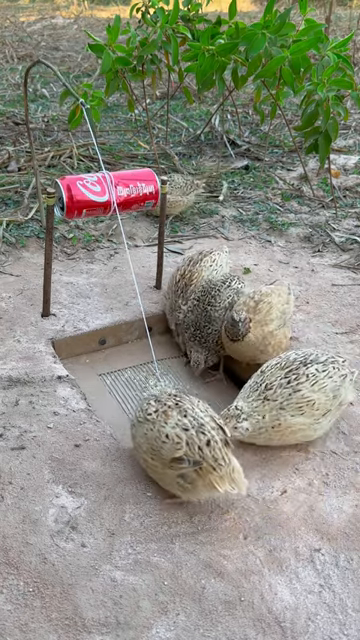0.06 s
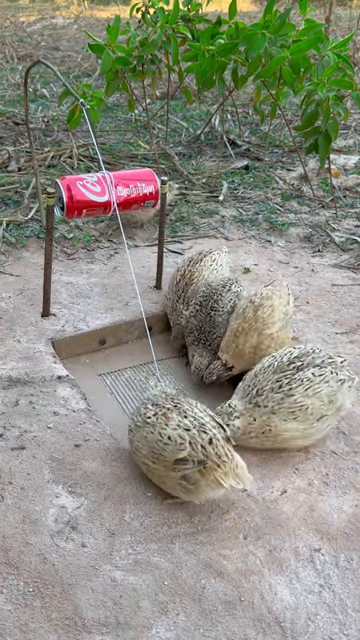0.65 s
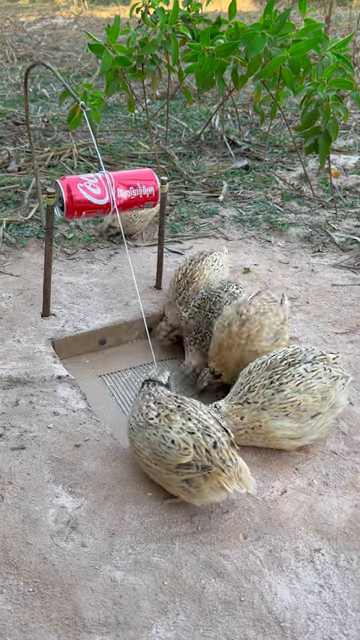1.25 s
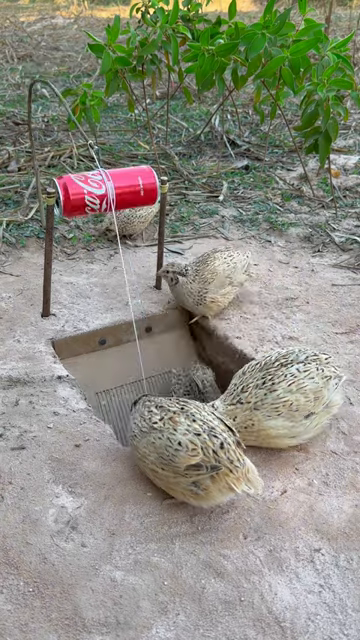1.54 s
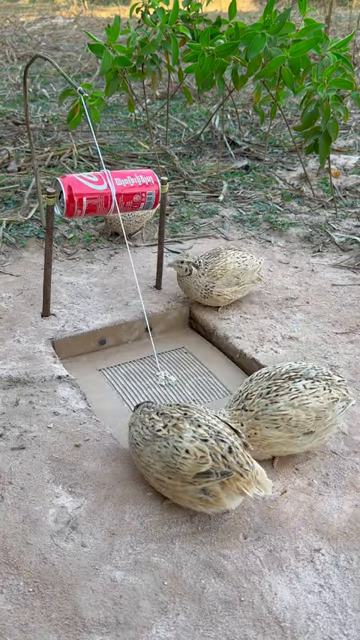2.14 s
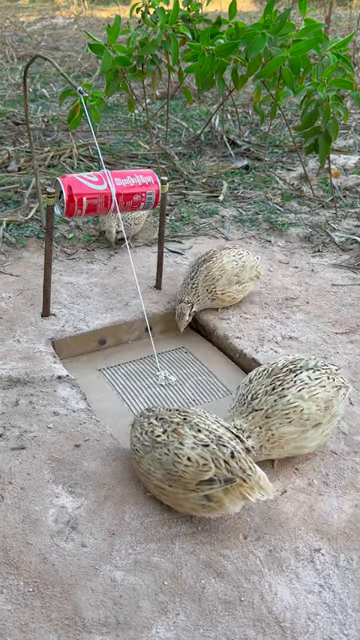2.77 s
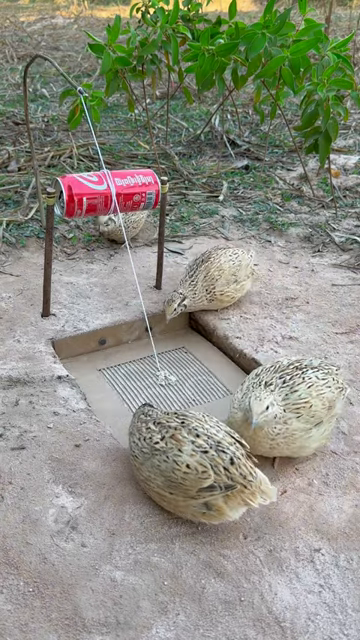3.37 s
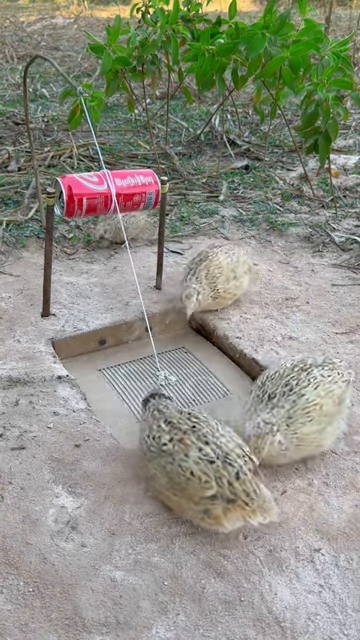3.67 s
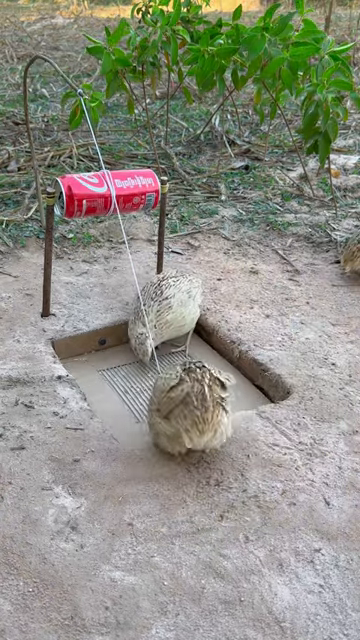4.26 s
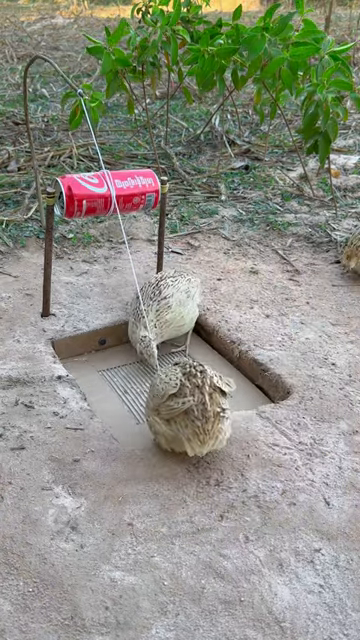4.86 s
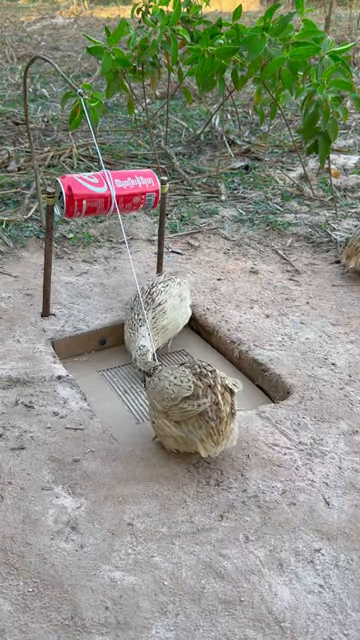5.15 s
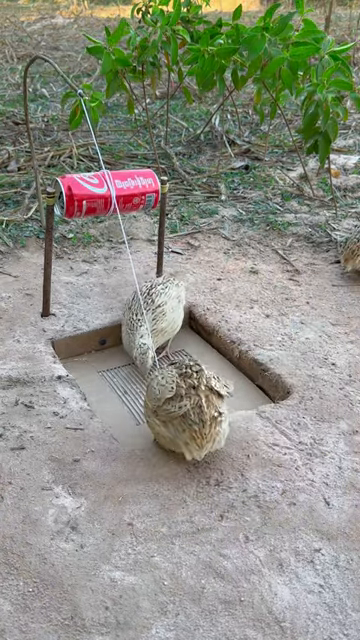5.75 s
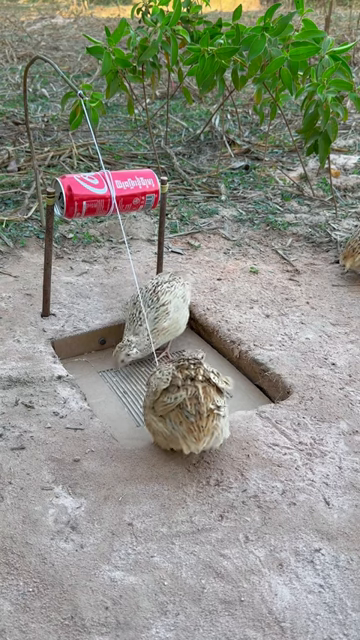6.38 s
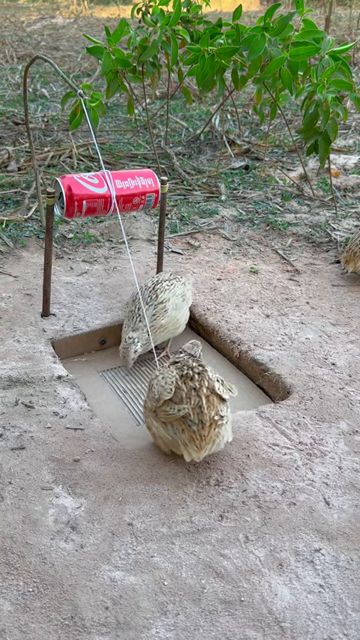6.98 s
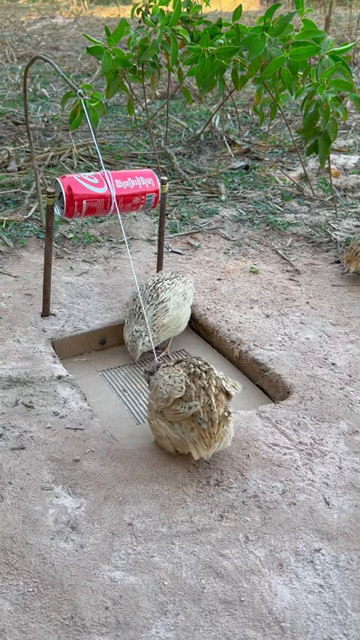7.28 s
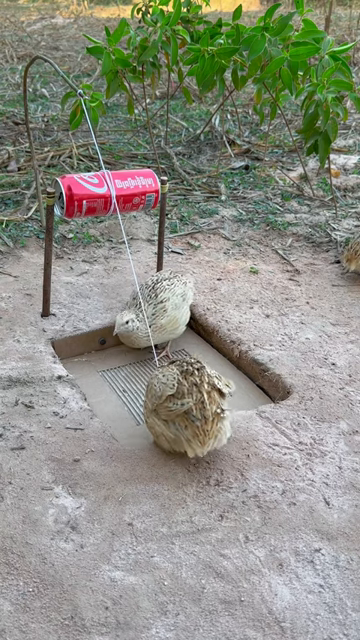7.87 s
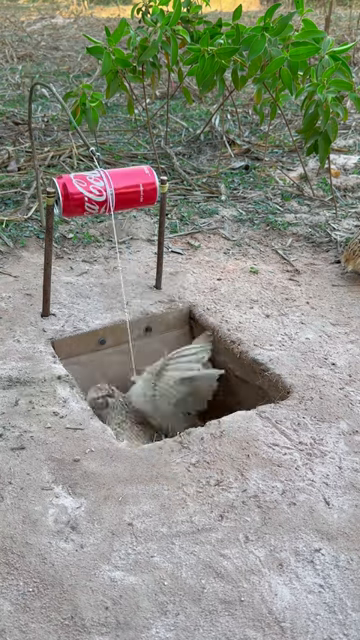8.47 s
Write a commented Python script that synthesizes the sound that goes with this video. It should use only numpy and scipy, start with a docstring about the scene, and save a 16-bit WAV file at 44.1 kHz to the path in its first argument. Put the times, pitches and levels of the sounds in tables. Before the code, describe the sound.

Quail peck grain off a hollow mesh lid in quick, uneven taps, twice scrabbling and flapping as it tips.

```python
"""Quail peck grain off the mesh of a hinged trap lid that covers a pit in a quiet yard.
Each impact excites the modes of lid and mesh; the lid booms over the hollow and loose grain jumps.
Twice the lid tips and birds slide in, with the friction noise of claws and flapping feathers.
Far insects and a bird sound as narrow bands of noise over a low rumble of air."""
import sys
import numpy as np
from scipy import signal
from scipy.fft import rfft, irfft, next_fast_len
from scipy.io import wavfile
from scipy.ndimage import uniform_filter1d

SR = 44100
rng = np.random.default_rng(int(sys.argv[2]) if len(sys.argv) > 2 else 0)


def transcribe(u):
    """Save the signal u as a 16-bit wav file named by the first command-line argument.

    u: samples, shape (n,) or (channels, n), limited to [-1, 1]; the rate is SR.
    q: integer samples, one column per channel.
    """
    v = np.clip(np.atleast_2d(u).T, -1, 1)
    q = np.round(v * 32767).astype(np.int16)
    wavfile.write(sys.argv[1], SR, q)


N = 380135

# Pecks and steps on the level lid. Each row: time in seconds, knock in dB, knock centre in Hz,
# beak click in dB, boom in dB, length of the push in seconds.
LEVEL_BLOWS = [(0.052, -36, 820, -55.5, -23, .022), (0.255, -42.5, 1090, -56.5, -28, .018),
               (0.354, -35, 835, -56, -20, .016), (0.391, -49, 1150, -55, -22, .01),
               (0.581, -31, 700, -51, -18.5, .015), (0.766, -36.5, 870, -76, -19.5, .017),
               (0.807, -42.5, 756, -46, -17.5, .012), (0.926, -39, 950, -53.5, -18.5, 0.01538),
               (0.953, -35.5, 635, -52.5, -27.5, .018), (1.125, -39.5, 880, -67, -24, .017),
               (1.261, -40, 750, -69, -25, .01), (1.268, -28, 785, -69, -17, .009),
               (1.414, -33.5, 630, -66, -18, .013), (3.594, -45.5, 865, -58.5, -21, .016),
               (3.633, -38, 1090, -50, -20.5, 0.012), (3.657, -48, 900, -50, -22.5, .016),
               (3.921, -33, 740, -46, -18.5, 0.0083), (4.124, -41.5, 740, -49, -23.5, .01),
               (4.351, -41, 716, -45.5, -23.5, 0.0077), (4.537, -43, 684, -57, -22, .011),
               (4.727, -32.5, 636, -62, -20, .027), (5.176, -31, 1110, -47, -17.5, 0.027),
               (5.395, -38.5, 840, -56, -25, 0.032), (5.629, -39.5, 1080, -66, -21, 0.024),
               (5.799, -31.5, 830, -44.5, -21, .026), (6.012, -33, 1220, -48.5, -18.5, .033),
               (6.209, -38.5, 830, -51, -22.5, 0.0097), (6.395, -38, 900, -50.5, -20, 0.0098),
               (6.724, -39.5, 900, -45, -22, 0.0074), (6.872, -37, 1070, -47, -18, 0.0052),
               (7.027, -28.5, 665, -45, -22.5, .004), (7.072, -60, 800, -64, -29.5, .018),
               (7.321, -37, 760, -52, -25.5, .042), (8.003, -35, 875, -46, -27.5, .026),
               (8.049, -36, 1250, -59, -33, 0.021), (8.067, -25.5, 1060, -52, -32, 0.011)]
# Claws and bodies on the tipped lid. Each row: the same six columns, then spilling grain in dB.
TIPPED_BLOWS = [(1.442, -29, 900, -40.5, -40, 0.007, -67), (1.454, -31, 610, -53, -23, 0.01, -47),
                (1.517, -28.5, 1140, -30.5, -26, 0.01, -46.5), (1.531, -28, 780, -41, -23, .02, -55.5),
                (1.603, -28, 695, -60, -37, 0.0091, -61), (1.623, -31, 755, -76, -29.5, 0.029, -59),
                (1.703, -41, 1070, -69, -35.5, .02, -54.5), (1.791, -37.5, 980, -50, -33.5, 0.03, -57),
                (1.858, -38, 1190, -45.5, -20.5, 0.013, -71), (1.873, -41, 653, -66, -17, 0.0084, -75),
                (8.165, -37, 895, -49.5, -25.5, 0.014, -68), (8.205, -35.5, 960, -43.5, -33.5, 0.0234, -57),
                (8.282, -38.5, 1070, -36, -50, .012, -41.5), (8.341, -28.5, 910, -44, -22.5, 0.026, -42),
                (8.499, -35.5, 1240, -47, -19.5, 0.019, -48), (8.518, -46, 1013, -38.5, -36, 0.0084, -46.5),
                (8.553, -38.5, 1310, -41.5, -17, 0.0072, -50.5)]
def blows(spill_s=1.2, full_grain_db=-31, spilled_grain_db=-36.5, onset_db=-21):
    """Impact excitation: each blow knocks the lid, pings the mesh and tosses grain."""
    rows = [(s, knock, centre, click, boom + (full_grain_db if s < spill_s else spilled_grain_db))
            for s, knock, centre, click, boom, push in LEVEL_BLOWS]
    rows += [(s, knock, centre, click, grain) for s, knock, centre, click, *_, grain in TIPPED_BLOWS]
    t, out = np.arange(round(.16 * SR)) / SR, np.zeros(N)
    for s, knock_db, centre_hz, click_db, grain_db in rows:
        add(out, s, gain_of(knock_db) * lid_knock(t, centre_hz))
        add(out, s, gain_of(click_db) * mesh_click(t))
        add(out, s, gain_of(grain_db) * jumping_grain(t))
        add(out, s - t[-1], gain_of(knock_db + onset_db) * soft_onset(t))
    return out

# Modes of the lid. Each row: frequency in Hz, level in dB, time to decay by 60 dB in seconds.
LID_MODES = [(251, 11.5, 0.017), (341, -3.5, 0.017), (454, -7.5, 0.083), (620, 0, 0.051), (740, 0, 0.02),
             (900, -0.5, 0.022), (1020, -8, 0.034), (1190, -7, 0.025), (1500, 1, 0.012), (1761, -7, 0.036),
             (1953, -6, 0.0099), (2317, -13, 0.066)]
def lid_knock(t, centre_hz, from_hz=583, to_hz=209.6, glide_s=.0036, swell_s=.006):
    """Forced vibration: contact drives the modes, and the lid gives way in a falling chirp."""
    force = contact(t, chatter=2.14, chatter_s=.0039)
    modes = ringing(LID_MODES, t, vary_db=2.2, centre_hz=centre_hz, focus_db=11.5)
    knock = signal.fftconvolve(force, modes)[:len(t)]
    hz = to_hz + (from_hz - to_hz) * np.exp(-t / glide_s)
    chirp = (t / swell_s) ** 2 * np.exp(-2 * t / swell_s) * np.sin(2 * np.pi * np.cumsum(hz) / SR)
    return held(knock, .0091) + gain_of(-5.5) * held(chirp, .0044)

# Spectrum of the click. Each row: frequency in Hz, spectral density in dB.
CLICK_SPECTRUM = [(800, -21.5), (2000, -13.5), (2900, -5), (3600, -17), (4400, -7.5), (5300, -17),
                  (6100, -16), (8200, -16), (10500, -15.5), (12800, -20), (15000, -17)]
# Modes of the wire mesh. Each row: frequency in Hz, level in dB, time to decay by 60 dB in seconds.
MESH_MODES = [(3000, -0.5, 0.12), (3680, 0.5, 0.036), (3940, -6.5, 0.077), (4400, 2, 0.022),
              (6210, -1, 0.074), (8950, -17.5, 0.029)]
def mesh_click(t):
    """Hard contact is broadband: it radiates a click and excites the high modes of the mesh."""
    bite = contact(t, chatter=8.5, chatter_s=.0031)
    ping = signal.fftconvolve(bite, ringing(MESH_MODES, t, vary_db=2.1))[:len(t)]
    return held(colour(bite, CLICK_SPECTRUM), .0096) + gain_of(-6.5) * held(ping, .0059)

# Spectrum of loose grain. Each row: frequency in Hz, spectral density in dB.
GRAIN_SPECTRUM = [(300, -1.5), (700, 0), (1700, -2), (3000, -6.5), (4500, -11.5), (6200, -14.5),
                  (7200, -18.5), (8500, -15.5), (11000, -17), (13000, -37), (15000, -18)]
def jumping_grain(t, rise_s=.0085, fall_s=.016):
    """Granular noise: many small collisions swell and fade as the grain jumps and settles."""
    jump = impacts(len(t), 5000, 4.65) * (1 - np.exp(-t / rise_s)) ** 2 * np.exp(-t / fall_s)
    return held(colour(jump, GRAIN_SPECTRUM), .054)

def soft_onset(t, rise_s=.0075):
    """Exponential rise: a faint, grainy hiss swells just before each knock and softens its attack."""
    hiss = impacts(len(t), 8400, 4) * np.exp(-t[::-1] / rise_s)
    return held(colour(hiss, GRAIN_SPECTRUM), .0037)

def swings(level_hz=141.16, loaded_hz=157, loaded_s=4, tipped_hz=165.7, usual_push_s=.01439):
    """Inertia delays each swing. Yields peak time in seconds, dB, pitch in Hz and push in seconds."""
    pushes = []
    for s, *_, db, push_s in LEVEL_BLOWS:
        hz = level_hz if s < loaded_s else loaded_hz  # standing birds pull the lid taut
        pushes.append((s, db, hz * (usual_push_s / push_s) ** .1714, push_s, -20.5))
    pushes += [(s, db, tipped_hz, push_s, -14) for s, *_, db, push_s, grain in TIPPED_BLOWS]
    for s, db, hz, push_s, rebound_db in pushes:
        peak_s = s + .0079 + .525 * push_s
        yield peak_s, db, hz, push_s
        yield peak_s + .034, db + rebound_db, hz * .89, usual_push_s  # one weaker, lower rebound

# Dull rattle of the loose lid. Each row: frequency in Hz, spectral density in dB.
RATTLE_SPECTRUM = [(30, -29), (70, -1.5), (110, 1), (180, -2), (250, -6.5), (320, -14.5), (450, -27.5),
                   (900, -72)]
def booms(sag=.072, sag_s=.0063, ring_s=.0036, linger=.22, linger_s=.031, rattle_s=.013):
    """Tension modulation: the lid's few low cycles start sharp under load and sink as it is let go."""
    t, out = np.arange(-round(.05 * SR), round(.15 * SR)) / SR, np.zeros(N)
    for s, db, hz, push_s in swings():
        load = .1436 * np.clip(-t / (.5986 * push_s), 0, 2.5) ** 2
        cycles = np.cumsum(hz * (1 + load - sag * np.tanh(t / sag_s))) / SR
        bell = np.exp(-(t / np.where(t < 0, .53 * push_s, ring_s + .6 * push_s)) ** 2)
        swing = np.where(t < 0, bell, (1 - linger) * bell + linger * np.exp(-abs(t) / linger_s))
        rattle = unit_rms(colour(rng.standard_normal(len(t)), RATTLE_SPECTRUM))
        rattle *= np.where(t < 0, bell, np.exp(-abs(t) / rattle_s))
        boom = swing * np.sin(2 * np.pi * (cycles + rng.random()))
        add(out, s + t[0], gain_of(db) * (boom + gain_of(-10.5) * rattle))
    return out

# Drags of a beak across the lid. Each entry: end time in seconds.
DRAG_ENDS = [0.808, 1.124, 1.415, 3.632, 4.123, 4.536, 4.727, 5.176, 6.873, 8.004, 8.068]
def slides(drag_db=-47.5, skid_above_click_db=1, rise_s=.0058):
    """Sliding friction: a dragging beak or skidding claw grows louder and stops short in a blow."""
    t, out = np.arange(round(.16 * SR)) / SR, np.zeros(N)
    drags = [(s, drag_db) for s in DRAG_ENDS]
    skids = [(s, click + skid_above_click_db) for s, knock, centre, click, *_ in TIPPED_BLOWS]
    for end_s, db in drags + skids:
        approach = impacts(len(t), 7000, 1.4) * np.exp(-t[::-1] / rise_s)
        add(out, end_s - t[-1], gain_of(db) * held(colour(approach, GRAIN_SPECTRUM), .0094))
    return out

# Light beak ticks on hard ground and wire. Each row: time in seconds, peak in dB, centre in Hz.
BEAK_TICKS = [(0.498, -28.5, 965), (0.6828, -32.5, 1450), (1.2526, -33, 902), (1.9806, -33.5, 1890),
              (3.9849, -32.5, 2600), (4.1856, -35.5, 3900), (4.2683, -44, 2620), (4.5013, -30, 860),
              (4.58, -17, 4070), (4.6885, -35.5, 910), (5.9613, -39.5, 1150), (6.092, -34, 1220),
              (6.5298, -29, 1020), (6.572, -30.5, 1120), (7.9627, -44, 1500), (8.2055, -19, 1900)]
def ticks(width_octaves=1.33):
    """A very brief contact gives a dry tick with one broad spectral peak."""
    t, out = np.arange(round(.04 * SR)) / SR, np.zeros(N)
    hz = np.geomspace(200, 16000, 12)
    for s, db, centre_hz in BEAK_TICKS:
        away = np.log2(hz / centre_hz) / width_octaves
        spectrum = np.column_stack([hz, np.where(away < 0, -8 * away ** 2, -4.5 * away)])
        tick = colour(contact(t, chatter=.54, chatter_s=.0041), spectrum)
        add(out, s, gain_of(db) * tick / abs(tick).max())
    return out

# Single wires of the mesh. Each row: time in seconds, frequency in Hz, peak in dB.
WIRE_PLUCKS = [(4.579, 4820, -30), (5.632, 2580, -36.5), (6.876, 2950, -27.5)]
def plucks(t60_s=.015):
    """Free vibration: a plucked wire rings as one damped sinusoid."""
    t, out = np.arange(round(.04 * SR)) / SR, np.zeros(N)
    for s, hz, db in WIRE_PLUCKS:
        add(out, s, gain_of(db - 60 * t / t60_s) * np.sin(2 * np.pi * hz * t))
    return out

# Spectra of claws and of feathers. Each row: frequency in Hz, spectral density in dB.
CLAW_SPECTRUM = [(100, -8), (180, 20.5), (260, -1.5), (380, -5), (620, 5.5), (1000, -0.5), (1600, -1.5),
                 (2300, -9.5), (3200, -14), (6000, -20.5)]
FEATHER_SPECTRUM = [(1000, -5), (2600, -8), (4000, -11), (6000, -13.5), (8000, -10), (10500, -7.5),
                    (12500, -19), (14300, -7), (16000, -9.5)]
# Two slides into the pit, a list for each. Each row: time in seconds, claws in dB, feathers in dB.
SCUFFLE_LEVELS = [
    [(1.24, -53, -91), (1.304, -48.5, -59), (1.41, -45.5, -66), (1.506, -44, -47.5), (1.672, -47, -55),
     (1.726, -67, -61), (1.8, -44, -46.5), (1.922, -57, -72), (2.0, -95, -60.5)],
    [(7.95, -49, -96), (8.022, -57.5, -65), (8.144, -55, -57), (8.2, -45, -52), (8.302, -37, -52),
     (8.38, -35, -47), (8.506, -58, -47), (8.62, -59, -55)],
]
def scuffles(flutter_db=3.5):
    """Friction noise: claws scrape down the lid and feathers brush the walls in uneven strokes."""
    out = np.zeros(N)
    for rows in SCUFFLE_LEVELS:
        s, claw_db, feather_db = np.transpose(rows)
        t = np.arange(s[0], s[-1], 1 / SR)
        flutter = gain_of(flutter_db * unit_rms(signal.resample(rng.standard_normal(70), len(t))))
        claws = unit_rms(colour(impacts(len(t), 3000, 2.2), CLAW_SPECTRUM))
        claws *= gain_of(np.interp(t, s, claw_db))
        feathers = unit_rms(colour(impacts(len(t), 9000, 7.5), FEATHER_SPECTRUM))
        feathers *= gain_of(np.interp(t, s, feather_db))
        add(out, s[0], (claws + feathers) * flutter * signal.windows.tukey(len(t), .04))
    return out

# Beats of a spread wing. Each row: time of full speed in seconds, level in dB, top pitch in Hz.
WING_STROKES = [(8.295, -30, 1201), (8.4, -35, 1549)]
def wingbeats(rise_s=.024, fall_s=.045, width_hz=1270):
    """Feathers swish over the rim of the pit; the noise rises in level and pitch with their speed."""
    t, out = np.arange(-round(.1 * SR), round(.2 * SR)) / SR, np.zeros(N)
    speed = np.exp(np.where(t < 0, t / rise_s, -t / fall_s))
    for s, db, hz in WING_STROKES:
        add(out, s + t[0], gain_of(db) * speed * noise_band(hz * (.75 + .25 * speed), width_hz))
    return out

# Feet and beaks on grit. Each row: start in seconds, length in seconds, level in dB.
GRIT_SCRATCHES = [(3.668, 0.1, -59.5), (4.584, 0.082, -65), (5.038, 0.14, -69.5), (5.559, 0.039, -66.5),
                  (6.087, 0.053, -60), (7.066, 0.068, -69.5), (7.598, 0.031, -76), (7.964, 0.049, -51)]
def scratches():
    """Granular friction: each stroke is a run of tiny impacts that starts fast and dies away."""
    out = np.zeros(N)
    for s, length_s, db in GRIT_SCRATCHES:
        along = np.linspace(0, 1, round(length_s * SR))
        grit = impacts(len(along), 2000, 2.3) * np.sqrt(along) * (1 - along)
        add(out, s, gain_of(db) * unit_rms(colour(grit, GRAIN_SPECTRUM)))
    return out

# Faint bird notes. Each row: start and length in seconds, first and last pitch in Hz, level in dB.
BIRD_NOTES = [(.19, 0.081, 2350, 2300, -74), (0.694, .04, 900, 1140, -65), (0.852, 0.038, 940, 1070, -65),
              (0.982, 0.051, 980, 1060, -59.5), (1.04, 0.064, 854, 870, -59.5),
              (1.188, 0.056, 900, 1020, -60.5), (2.251, 0.16, 1100, 1043, -76),
              (2.421, 0.17, 2360, 4570, -79.5), (2.564, 0.049, 605, 620, -60),
              (2.56, 0.12, 1070, 1190, -71), (3.118, .15, 1444, 1390, -77), (3.801, 0.3, 1166, 1230, -69.5),
              (3.992, 0.11, 1030, 955, -68), (4.222, .04, 900, 840, -60), (4.231, 0.056, 582, 570, -63)]
def bird_notes():
    """Narrowband noise on a gliding pitch is heard as a soft, husky note."""
    out = np.zeros(N)
    for s, length_s, from_hz, to_hz, db in BIRD_NOTES:
        hz = np.linspace(from_hz, to_hz, round(length_s * SR))
        add(out, s, gain_of(db) * noise_band(hz, .15 * from_hz) * signal.windows.tukey(len(hz), .7))
    return out

# Chorus of far insects. Each row: centre in Hz, bandwidth in Hz, level in dB.
INSECT_CHORUS = [(4780, 380, -90), (7720, 520, -90)]
# Insect trills. Each row: start in seconds, length in seconds, pitch in Hz, level in dB.
INSECT_TRILLS = [(.6, 0.35, 5170, -80), (1.806, 0.27, 5170, -78), (2.579, .82, 4780, -91),
                 (2.976, 0.4, 5170, -82.5), (4.839, 0.31, 5170, -81.5), (5.985, 0.34, 5170, -76),
                 (7.399, 0.27, 5170, -80), (2.43, 0.17, 7750, -86), (3.233, .18, 7750, -87),
                 (7.473, 0.43, 7650, -84)]
def insects(waver_db=1.5):
    """Amplitude modulation: high bands of noise waver as a chorus or swell briefly as trills."""
    out = np.zeros(N)
    for hz, width_hz, db in INSECT_CHORUS:
        waver = unit_rms(signal.resample(rng.standard_normal(30), N))
        out += gain_of(db + waver_db * waver) * noise_band(np.full(N, hz), width_hz)
    for s, length_s, hz, db in INSECT_TRILLS:
        trill = noise_band(np.full(round(length_s * SR), hz), .032 * hz)
        add(out, s, gain_of(db) * trill * signal.windows.tukey(len(trill), .6))
    return out

# Decay of the pit. Each row: frequency in Hz, time to decay by 60 dB in seconds.
PIT_DECAY = [(150, 0.26), (600, 0.25), (2000, 0.13), (8000, 0.5)]
def pit_reflections(x):
    """Reverberation: short, dense reflections from pit and ground, different at each ear."""
    taps = np.array([impacts(SR // 3, 3000, 1) for side in range(2)])
    hz, t, spectra = signal.stft(taps, SR, nperseg=256)
    decay = gain_of(-60 * t / curve_at(PIT_DECAY, hz)[:, None])
    tail = signal.istft(spectra * decay, SR, nperseg=256)[1]
    tail /= np.linalg.norm(tail, axis=1, keepdims=True)
    return signal.fftconvolve(x[None], tail, axes=1)[:, :N]

# Ground scatter that differs between the sides. Each row: frequency in Hz, relative level in dB.
GROUND_SCATTER = [(100, -25), (250, -23), (700, -13), (1400, -10), (4000, -10), (12000, -9)]
# Phase of left against right. Each row: frequency in Hz, phase difference in radians.
STEREO_PHASE = [(100, 0), (2200, 0), (4900, .1), (5900, -.4), (9000, -2.2), (11000, -3.1), (14600, -3.7),
                (16000, -4.6)]
def two_sides(x, scatter_s=.008):
    """Interference: sound and its ground scatter sum at two receivers, out of step in the treble."""
    size = next_fast_len(N)
    hz, sides = np.fft.rfftfreq(size, 1 / SR), np.array([[1], [-1]])
    ground = impacts(SR, 6000, 1) * np.exp(-np.arange(SR) / SR / scatter_s)
    scatter = gain_of(curve_at(GROUND_SCATTER, hz)) * rfft(ground / np.linalg.norm(ground), size)
    response = (1 + sides * scatter) * np.exp(.5j * curve_at(STEREO_PHASE, hz) * sides)
    return irfft(rfft(x, size) * response, size)[:, :N]

# Air of the yard. Each row: frequency in Hz, relative spectral density in dB.
AIR_SPECTRUM = [(15, -9.5), (55, 0.5), (90, 0.5), (130, -7.5), (200, -22.5), (360, -29.5), (450, -30),
                (540, -33), (625, -27), (760, -30), (1150, -31.5), (1700, -34), (3000, -36), (5800, -46),
                (8000, -53), (10000, -53.5), (16000, -64.5)]
def yard_air(level_db=-57, gust_db=-1, patchy_db=3):
    """Modulated noise: a lumpy rumble, nearly alike at both ears, under a wide, patchy hiss."""
    hz, t, spectra = signal.stft(rng.standard_normal((2, N)), SR, nperseg=2048)
    patches = uniform_filter1d(rng.standard_normal(spectra.shape[1:]), size=14, axis=0)
    patches = unit_rms(uniform_filter1d(patches, size=7, axis=1))
    gusts = unit_rms(uniform_filter1d(rng.standard_normal(len(t)), size=4))
    gusts = gusts / (1 + (hz[:, None] / 200) ** 2)
    shape_db = curve_at(AIR_SPECTRUM, hz)[:, None] + patchy_db * patches + gust_db * gusts
    mid, side = spectra * gain_of(shape_db)
    side *= gain_of(curve_at([(150, -15), (1000, 1), (6000, -.5)], hz))[:, None]
    air = signal.istft(np.array([mid + side, mid - side]), SR, nperseg=2048)[1][:, :N]
    return gain_of(level_db) * unit_rms(air)

def contact(t, chatter, chatter_s):
    """Contact force: a first impulse, then a short chatter of blows as the beak bites."""
    after = impacts(len(t), 2500, 4) * np.exp(-t / chatter_s) * (1 - np.exp(-t / .001))
    return (t == 0) + chatter * after / (np.linalg.norm(after) + 1e-9)

def ringing(modes, t, vary_db, centre_hz=850, focus_db=0):
    """Modal superposition: the struck spot favours modes near its centre, by focus_db per octave."""
    hz, db, t60 = np.transpose(modes)[:, :, None]
    spot, detune = rng.standard_normal((2, len(modes), 1))
    weight = gain_of(db + vary_db * spot - focus_db * abs(np.log2(hz / centre_hz)))
    return (weight * gain_of(-60 * t / t60) * np.sin(2 * np.pi * hz * (1 + .044 * detune) * t)).sum(0)

def impacts(samples, per_s, spread_db):
    """Shot noise: random tiny impacts, a few much larger than the rest."""
    size = gain_of(spread_db * np.minimum(rng.exponential(1, samples), 4))
    return size * rng.choice([-1, 1], samples) * (rng.random(samples) < per_s / SR)

def noise_band(hz, width_hz):
    """Frequency shifting: low-passed noise becomes a fuzzy tone that follows the pitch curve hz."""
    pole = np.exp(-np.pi * width_hz / SR)
    noise = rng.standard_normal(len(hz)) + 1j * rng.standard_normal(len(hz))
    fuzz = signal.lfilter([1], [1, -2 * pole, pole * pole], noise)
    return unit_rms((fuzz * np.exp(2j * np.pi * np.cumsum(hz) / SR)).real)

def colour(x, spectrum):
    """Minimum-phase filtering shapes the spectrum while clicks keep their sharp front."""
    log_gain = np.log(gain_of(curve_at(spectrum, abs(np.fft.fftfreq(4096, 1 / SR)))))
    taps = np.fft.ifft(np.exp(np.conj(signal.hilbert(log_gain)))).real[:2048]
    return signal.fftconvolve(x, taps)[:len(x)]

def held(x, length_s):
    """Energy normalisation: the burst carries as much as level 1 held for length_s."""
    return x / np.sqrt(np.sum(x ** 2) / (length_s * SR) + 1e-20)

def unit_rms(x):
    return x / np.sqrt(np.mean(x ** 2) + 1e-20)

def gain_of(db):
    return 10 ** (np.asarray(db) / 20)

def curve_at(points, hz):
    """Interpolation on a logarithmic frequency axis."""
    point_hz, value = np.transpose(points)
    return np.interp(np.log(hz + 1), np.log(point_hz + 1), value)

def add(mix, s, sound):
    """Sums a sound into the mix from s seconds on."""
    at = round(s * SR)
    sound = sound[max(-at, 0):]
    part = mix[max(at, 0):][:len(sound)]
    part += sound[:len(part)]

def scene(pit_db=-18.5):
    """Superposition: all sources add, and the near impacts and rustles also reflect in the pit."""
    near = blows() + slides() + ticks() + plucks() + scratches() + scuffles() + wingbeats()
    direct = two_sides(near + booms() + insects() + bird_notes())
    return direct + gain_of(pit_db) * pit_reflections(near) + yard_air()

def record(dry, cutoff_hz=16100):
    """Band limiting: a steep low-pass filter removes the highest treble."""
    low_pass = signal.firwin(511, cutoff_hz, window=("kaiser", 9), fs=SR)
    return signal.oaconvolve(dry, low_pass[None], "same")

dry = scene()
out = record(dry)
transcribe(out)
```